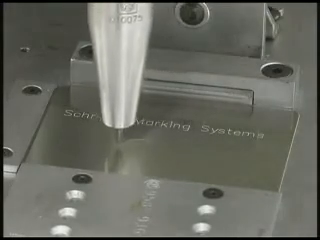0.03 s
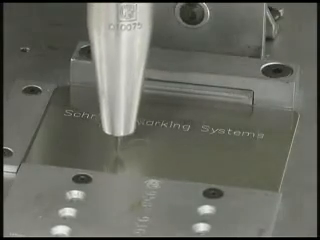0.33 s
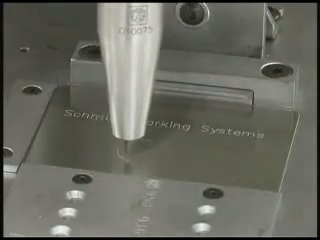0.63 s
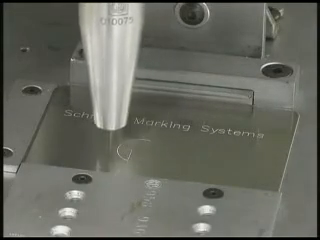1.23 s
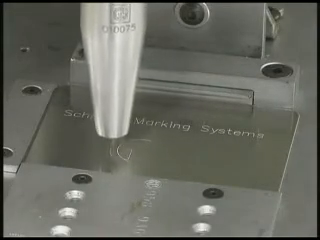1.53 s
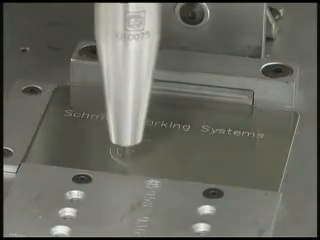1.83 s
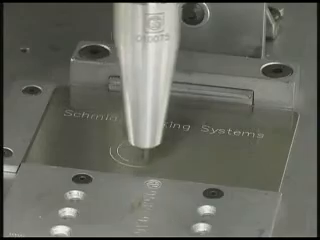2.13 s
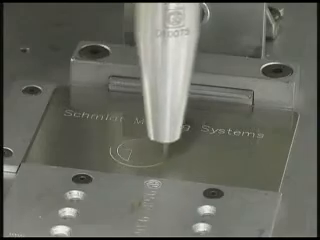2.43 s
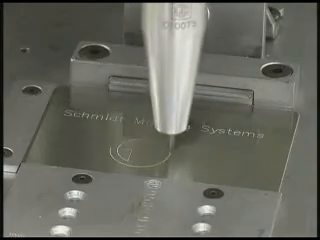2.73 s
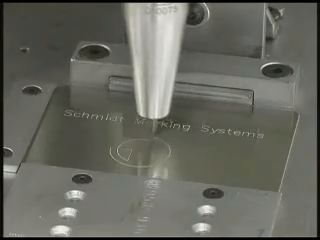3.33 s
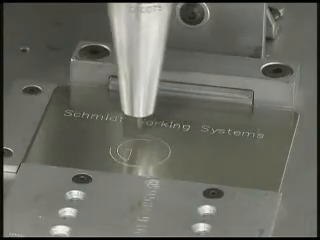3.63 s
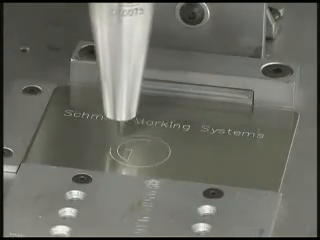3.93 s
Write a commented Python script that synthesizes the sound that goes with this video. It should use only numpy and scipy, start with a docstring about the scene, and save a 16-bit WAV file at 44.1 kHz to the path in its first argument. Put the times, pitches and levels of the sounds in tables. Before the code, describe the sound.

A pneumatic marking stylus strikes a metal plate so fast that it makes a hard, steady buzz, with high steel ringing and hissing air on top. At about 1.2 seconds it drops out for a tenth of a second, with a soft thud as it stops and another as it restarts. From about 3 seconds to the end at 4, it clacks harder and brighter, close up in a small workshop.

```python
"""A pneumatic dot peen marker engraves a metal plate, close up in a small workshop.
Its piston shuttles about 185 times a second: each stroke thumps, strikes the stylus on the plate
and knocks back, fusing into a hard buzz. Steel parts ring on top and spent air hisses out.
The stylus lifts once between two lines, with a soft thud as the air is cut and another as it returns.
Near the end the plate clacks harder."""
import sys
import numpy as np
from scipy import signal
from scipy.fft import rfft, irfft
from scipy.io import wavfile
from scipy.ndimage import uniform_filter1d

SR = 44100
rng = np.random.default_rng(int(sys.argv[2]) if len(sys.argv) > 2 else 0)


def wav_out(sig):
    """Save sig, one row per channel (or a flat mono array), as 16-bit PCM at SR to the path in sys.argv[1]."""
    wavfile.write(sys.argv[1], SR, np.round(np.clip(np.atleast_2d(sig).T, -1, 1) * 32767).astype(np.int16))


N = 176400
TIME = np.arange(N) / SR

# Decay of the workshop: frequency_hz, t60_s
ROOM_DECAY = [(150, 0.33), (1000, 0.74), (3000, 0.8), (7000, 0.24), (12000, .3)]
# Colour of the room tail: frequency_hz, gain_db
ROOM_EQ = [(150, -14), (400, -5.5), (900, -2.5), (2000, 0), (3000, -2.5), (4700, 0), (6000, -3.5),
           (8000, -6), (12000, -10.5)]
# Modes of the machine frame: pitch_hz, width_hz, level_db
FRAME_MODES = [(1007, 59, -53.5), (1204, 84, -54.5), (1991, 16, -47)]
# Left-right likeness of the noise layers: frequency_hz, coherence
NOISE_COHERENCE = [(50, 1), (1000, 0.33), (4000, 0.36), (6000, 0.43), (8000, 1), (12000, 1)]
# Colour of the low rumble: frequency_hz, gain_db
RUMBLE_EQ = [(20, -20), (38, -3), (70, 4), (120, -10.5), (200, 1), (300, -21.5), (600, -19), (2000, -56)]
# Colour of the spent air: frequency_hz, gain_db
HISS_EQ = [(200, -20), (500, -32), (830, -27), (1100, -15.5), (1400, -18.5), (1800, -18), (2200, -12.5),
           (2800, -2.5), (3400, -10), (4050, -5), (4700, 1.5), (5250, -1), (6200, 1.5), (7300, 2),
           (7900, -6.5), (8500, 0), (9500, -4.5), (10300, -2.5), (11000, -6), (12400, -15)]
# Fader of the spent air: time_s, level_db
HISS_FADER = [(0, -26), (.6, -22.5), (1.15, -24.5), (1.35, -22.5), (2.6, -22.5), (3.1, -27.5), (4, -27)]
# Thuds of the valve shutting and opening: peak_s, level_db
VALVE_THUDS = [(1.184, -36), (1.282, -39.5)]
# Colour of those thuds: frequency_hz, gain_db
THUD_EQ = [(20, -10), (60, 1), (120, -1), (200, -13), (330, 0.5), (500, -16), (1500, -49)]
# Plate tones that bloom under the stylus: peak_s, half_length_s, pitch_hz, glide_hz_per_s, level_db
PLATE_BLOOMS = [(0.88, 0.36, 8450, -700, -35), (0.67, 0.38, 6050, 0, -33), (2.3, 0.69, 6540, -100, -30.5),
                (2.1, .4, 7040, 0, -31.5), (2.906, 0.23, 6720, 0, -33), (2.64, .3, 10250, 300, -37.5),
                (3.55, 0.38, 4350, 0, -32)]
# Modes of the small steel parts: pitch_hz, width_hz, relative_db
STEEL_MODES = [(4745, 140, 0.5), (4945, 110, 0.5), (5530, 100, -4.5), (5580, 56, -4.5), (6050, 100, -2),
               (6470, 120, -3.5), (7000, 37, -4.5), (7260, 97, -4), (7510, 59, 1.5), (8090, 31, -3),
               (8540, 59, -5.5), (9100, 90, -26.5), (9730, 61, -6.5), (10180, 34, -7), (11800, 38, -12),
               (11500, 65, -7)]
# Low cut, as small parts radiate little bass: frequency_hz, gain_db
STEEL_EQ = [(1000, -16), (3000, -9), (4500, 0.5), (13000, -0.5)]
# Fader of the ringing steel: time_s, level_db
STEEL_FADER = [(0, -26.5), (.6, -32.5), (1.15, -25.5), (1.5, -29), (1.95, -30.5), (2.6, -28), (3.1, -27),
               (4, -29)]
# Fader of the buzz's octave: time_s, level_db
OCTAVE_FADER = [(0, -45), (.5, -36.5), (.85, -42), (1.15, -42.5), (1.45, -42), (1.65, -35), (2.2, -40.5),
                (2.65, -39.5), (3.1, -46.5), (3.4, -44), (4, -46.5)]
# Colour of the piston's air kick: frequency_hz, gain_db
PISTON_EQ = [(60, -8), (130, 13), (185, 5), (260, -12), (370, -20.5), (555, -14), (740, -3), (925, -2.5),
             (1110, -12), (1300, -8.5), (1490, -2), (1670, 5), (1850, -29), (2300, -7.5), (5000, -24.5)]
# Fader of the piston: time_s, level_db
PISTON_FADER = [(0, -32), (.6, -31), (1.1, -30.5), (1.7, -30.5), (2.6, -30), (3.1, -32), (4, -32.5)]
# Colour of the plate's clack: frequency_hz, gain_db
CLACK_EQ = [(500, -83), (1200, -17.5), (1900, -2.5), (2300, 0.5), (2900, 1), (3300, 0.5), (3750, 4.5),
            (4050, 3), (4350, 8), (4720, 10.5), (5050, 0), (5500, -3), (7000, -49), (12000, -43)]
# Fader of the clack: time_s, level_db
CLACK_FADER = [(0, -35), (1.1, -38), (1.7, -37), (2.1, -40), (2.7, -32.5), (3.05, -27.5), (3.25, -23.5),
               (3.58, -22), (3.8, -24), (3.87, -27), (4, -25)]
# Modes of the stylus and its housing: pitch_hz, width_hz, relative_db
STYLUS_MODES = [(2140, 200, -6), (2447, 176, 0.5), (2811, 114, 4.5), (2927, 71, 0.5), (3630, 110, -18),
                (5070, 350, -11), (5400, 280, -16), (6500, 500, -28)]
# Fader of the stylus strikes: time_s, level_db
STYLUS_FADER = [(0, -30), (.65, -32.5), (.85, -27.5), (1.1, -27.5), (1.35, -31), (1.8, -31), (2.5, -28),
                (2.95, -28), (3.6, -31.5), (4, -37)]
# Pace of the piston: time_s, rate_hz
STROKE_RATE = [(0.0, 187.2), (0.02, 186.2), (0.2, 186.2), (0.5, 182.3), (0.62, 182.3), (0.79, 187.8),
               (0.96, 187), (1.34, 186.6), (1.55, 184.4), (1.86, 181.1), (1.88, 183.6), (2.32, 185.6),
               (2.67, 183.5), (3.0, 188), (3.83, 189.2), (3.87, 187.2), (3.92, 187.5), (4.0, 188.6)]
# Stereo balance: frequency_hz, left_minus_right_db
STEREO_BALANCE = [(60, -3), (185, -1.5), (370, 1.4), (740, -4.5), (1200, -4), (2300, -1), (4000, -1.2),
                  (7000, 0.5), (12000, -1.5)]
# Stereo phase: frequency_hz, left_lead_rad
STEREO_PHASE = [(185, 0.58), (370, 0.36), (750, 0.41), (1500, 0.29), (2400, 0.48), (3000, -0.73),
                (4900, 0.2), (5300, -1.4), (5700, 0.58), (6300, -1.33), (12000, -0.47)]


def amp(db):
    """Decibels to gain."""
    return 10 ** (np.asarray(db) / 20)


def unit_rms(x):
    """Scales to rms 1."""
    return x / np.sqrt(np.mean(x ** 2) + 1e-20)


def at_hz(points, hz):
    """Reads a curve on a log-frequency axis."""
    frequencies, values = np.transpose(points)
    return np.interp(np.log(hz + 1), np.log(frequencies + 1), values)


def automation(points):
    """Reads a time curve at every sample."""
    return np.interp(TIME, *np.transpose(points))


def drift(hz, size=2048):
    """A smooth random wobble of rms 1, moving at roughly the given speed."""
    ratio = np.arange(size // 2 + 1) * SR / N / hz
    slow = irfft(rfft(rng.standard_normal(size)) * ratio * np.exp(-ratio ** 2), size)
    return np.interp(TIME, np.linspace(0, N / SR, size), unit_rms(slow))


def clicks(times, gains, half_width=8):
    """Windowed sinc clicks, placed exactly even between samples."""
    index = np.floor(times * SR).astype(int)[:, None] + np.arange(1 - half_width, half_width + 1)
    offset = index - times[:, None] * SR
    pulses = gains[:, None] * np.sinc(offset) * np.cos(np.pi * offset / (2 * half_width)) ** 2
    inside = (index >= 0) & (index < N)
    return np.bincount(index[inside], pulses[inside], N)


def equalise(x, eq, size=4096):
    """Minimum-phase EQ: nothing rings ahead of a hit."""
    log_gain = np.log(amp(at_hz(eq, abs(np.fft.fftfreq(size, 1 / SR)))))
    response = np.fft.ifft(np.exp(np.conj(signal.hilbert(log_gain)))).real
    return signal.oaconvolve(x, response[:size // 2])[:N]


def mode(x, hz, width_hz):
    """Rings one decaying resonance, scaled to rms 1."""
    radius, angle = np.exp(-np.pi * width_hz / SR), 2 * np.pi * hz / SR
    pole_real = radius * np.cos(angle)
    return unit_rms(signal.lfilter([1, -pole_real], [1, -2 * pole_real, radius ** 2], x + 1e-18))


def gliding_mode(x, hz, width_hz):
    """Rings a resonance whose pitch follows a curve, scaled to rms 1."""
    carrier = np.exp(2j * np.pi * np.cumsum(hz) / SR)
    envelope = signal.lfilter([1], [1, -np.exp(-np.pi * width_hz / SR)], x * carrier.conj() + 1e-18)
    return unit_rms((carrier * envelope).real)


def stereo_noise(eq, flicker_db, size):
    """Shaped stereo noise of rms 1 whose colour flickers in brief random patches."""
    hz = np.fft.rfftfreq(size, 1 / SR)
    draws = rng.standard_normal((5, N * 4 // size + 5, len(hz)))
    left, unrelated = draws[0] + 1j * draws[1], draws[2] + 1j * draws[3]
    patches = uniform_filter1d(draws[4], size=5, axis=0)
    patches = unit_rms(uniform_filter1d(patches, size=4, axis=1))
    coherence = at_hz(NOISE_COHERENCE, hz)
    right = coherence * left + np.sqrt(1 - coherence ** 2) * unrelated
    spectra = np.array([left, right]) * amp(at_hz(eq, hz) + flicker_db * patches)
    _, noise = signal.istft(spectra.swapaxes(1, 2), nperseg=size, noverlap=size * 3 // 4)
    return unit_rms(noise[:, :N])


def air_supply(shut_s=1.199, open_s=1.279, ramp_s=0.012, idle_db=-17):
    """The valve's gain: it ducks to a faint idle while the stylus lifts between two lines."""
    opening = np.maximum(shut_s - TIME, TIME - open_s) / ramp_s + .5
    return np.clip(opening, amp(idle_db), 1)


def blows(times, spread_db, jitter_s):
    """One click a stroke, scaled by the air supply and scattered in strength and timing."""
    strength, lateness = rng.standard_normal((2, 1000))[:, :len(times)]
    gains = np.interp(times, TIME, air_supply()) * amp(spread_db * strength)
    return clicks(times + jitter_s * lateness, gains)


def room_reverb(x, build_s=.008, size=256):
    """A diffuse workshop tail for each ear, every band dying at its own speed."""
    hz, t, bands = signal.stft(rng.standard_normal((2, SR // 2)), SR, nperseg=size)
    bands = bands * amp(-60 * t / at_hz(ROOM_DECAY, hz)[:, None]) * np.minimum(t / build_s, 1)
    bands /= np.sqrt((abs(bands) ** 2).sum(-1).mean(0))[:, None]  # equal energy in every band
    scale = np.linalg.norm(signal.istft(bands, nperseg=size)[1][0])
    _, tail = signal.istft(bands * amp(at_hz(ROOM_EQ, hz))[:, None], nperseg=size)
    return signal.fftconvolve(x, tail / scale, axes=1)[:, :N]


def low_rumble(level_db=-48.5):
    """A faint, steady bed of low noise."""
    return amp(level_db) * stereo_noise(RUMBLE_EQ, flicker_db=2, size=4096)


def frame_hum():
    """Random rattle keeps the frame humming at its own pitches."""
    return sum(amp(db) * mode(air_supply() * rng.standard_normal(N), hz, width_hz)
               for hz, width_hz, db in FRAME_MODES)


def exhaust_hiss(cycles):
    """Spent air hisses out, pulsing slightly with the strokes."""
    pulse_db = .5 * np.cos(2 * np.pi * (cycles - .15))
    level_db = automation(HISS_FADER) + pulse_db + .98 * drift(hz=30)
    return air_supply() * amp(level_db) * stereo_noise(HISS_EQ, flicker_db=5.5, size=1024)


def valve_thuds(attack_s=0.012, decay_s=0.032):
    """The head jolts when its air is cut and when it returns."""
    envelope = np.zeros(N)
    for peak_s, db in VALVE_THUDS:
        attack = np.clip((TIME - peak_s) / attack_s + 1, 0, 1)
        envelope += amp(db) * attack * np.exp(-np.maximum(TIME - peak_s, 0) / decay_s)
    return envelope * stereo_noise(THUD_EQ, flicker_db=0, size=2048)


def plate_blooms(times):
    """Single plate tones swell and sing while the stylus works near their spot."""
    tones = np.zeros(N)
    for peak_s, half_length_s, hz, glide_hz_per_s, db in PLATE_BLOOMS:
        hits = blows(times, spread_db=2.5, jitter_s=25e-6)
        pitch_hz = hz + glide_hz_per_s * (TIME - peak_s) + 45 * drift(hz=9.6)
        swell = np.exp(-((TIME - peak_s) / half_length_s) ** 4)
        tones += amp(db) * swell * gliding_mode(hits, pitch_hz, width_hz=43)
    return tones


def steel_ring(times, shimmer_db=8):
    """Every strike lands differently, so each high steel mode swells and fades by itself."""
    ring = np.zeros(N)
    for hz, width_hz, db in STEEL_MODES:
        gain = amp(db + shimmer_db * np.tanh(drift(hz=16.5)))
        ring += gain * mode(blows(times, spread_db=2.5, jitter_s=18e-6), hz, width_hz)
    return amp(automation(STEEL_FADER)) * unit_rms(equalise(ring, STEEL_EQ))


def buzz_octave(cycles):
    """A sine an octave above the buzz swells and fades as the head travels."""
    level_db = automation(OCTAVE_FADER) + 2 * drift(hz=22.5)
    return air_supply() * amp(level_db) * unit_rms(np.cos(4 * np.pi * cycles))


def piston_thump(times, lead_s=0.00054):
    """The low body of the buzz: an air kick drives the piston just ahead of each strike."""
    kicks = blows(times - lead_s, spread_db=0, jitter_s=10e-6)
    level_db = automation(PISTON_FADER) + drift(hz=19)
    return amp(level_db) * unit_rms(equalise(kicks, PISTON_EQ))


def plate_clack(times):
    """The bright edge: the plate clacks under the strikes, hardest near the end."""
    level_db = automation(CLACK_FADER) + .93 * drift(hz=25)
    hits = blows(times, spread_db=.53, jitter_s=3e-6)
    return amp(level_db) * unit_rms(equalise(hits, CLACK_EQ))


def stylus_strikes(times, return_s=0.001798, return_db=-9):
    """The bite: each strike and the piston's return knock ring the stylus and its housing."""
    strikes = blows(times, spread_db=.5, jitter_s=4e-6)
    knocks = amp(return_db) * blows(times + return_s, spread_db=1, jitter_s=10e-6)
    ring = sum(amp(db) * mode(strikes + knocks, hz, width_hz) for hz, width_hz, db in STYLUS_MODES)
    level_db = automation(STYLUS_FADER) + .8 * drift(hz=25.3)
    return amp(level_db) * unit_rms(ring)


def scene(waver_hz=0.4, jitter_s=4e-6, reverb_db=-4.5):
    """One train of strokes drives the air and metal layers, mixed with the room."""
    cycles = np.cumsum(automation(STROKE_RATE) + waver_hz * drift(hz=13.6)) / SR
    times = np.interp(np.arange(int(cycles[-1]) + 1), cycles, TIME)  # one strike per piston cycle
    times += jitter_s * rng.standard_normal(N)[:len(times)]
    air = piston_thump(times) + buzz_octave(cycles) + valve_thuds() + exhaust_hiss(cycles)
    rumble = low_rumble()
    impacts = stylus_strikes(times) + plate_clack(times)
    ringing = steel_ring(times) + plate_blooms(times) + frame_hum()
    direct = rumble + air + ringing + impacts
    return direct + amp(reverb_db) * room_reverb(direct)


def record(dry, cutoff_hz=12800):
    """Two microphone ports hear each band at their own level and phase; a low-pass trims the top."""
    hz = np.fft.rfftfreq(N, 1 / SR)
    left_gain = amp(at_hz(STEREO_BALANCE, hz) / 2) * np.exp(.5j * at_hz(STEREO_PHASE, hz))
    pair = irfft(rfft(dry) * np.array([left_gain, 1 / left_gain]), N)
    lowpass = signal.firwin(401, cutoff_hz, window=("kaiser", 9), fs=SR)
    return signal.oaconvolve(pair, lowpass[None], "same")


dry = scene()
out = record(dry)
wav_out(out)
```